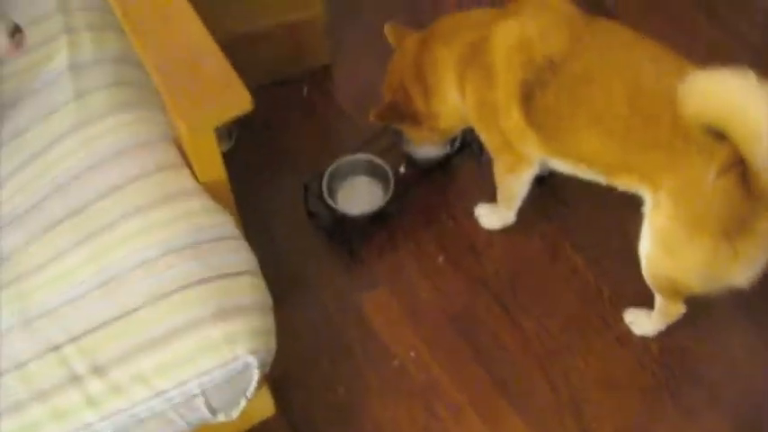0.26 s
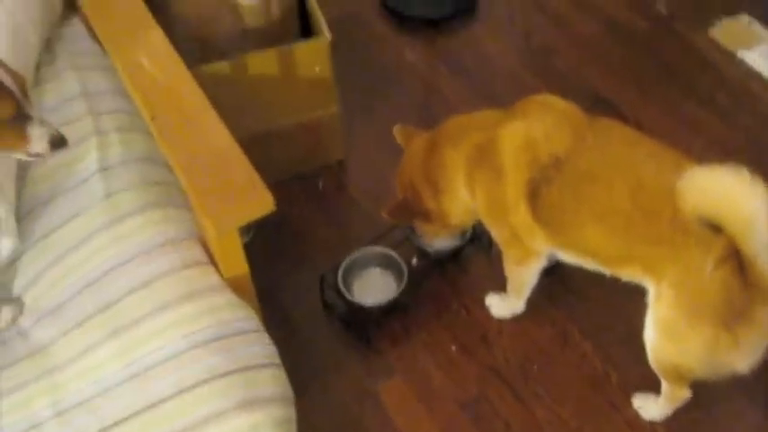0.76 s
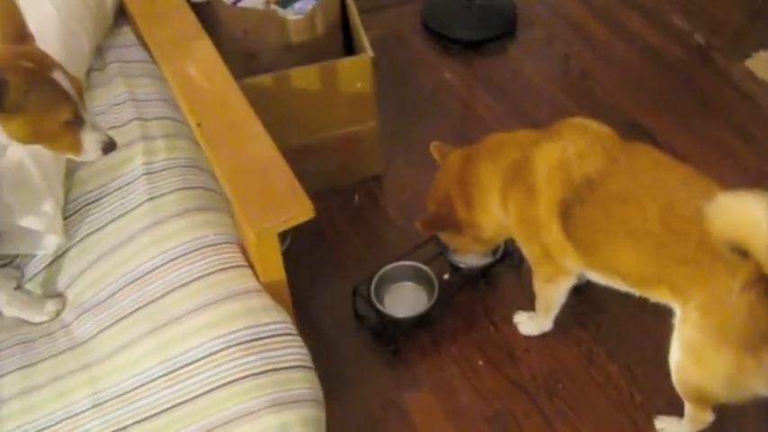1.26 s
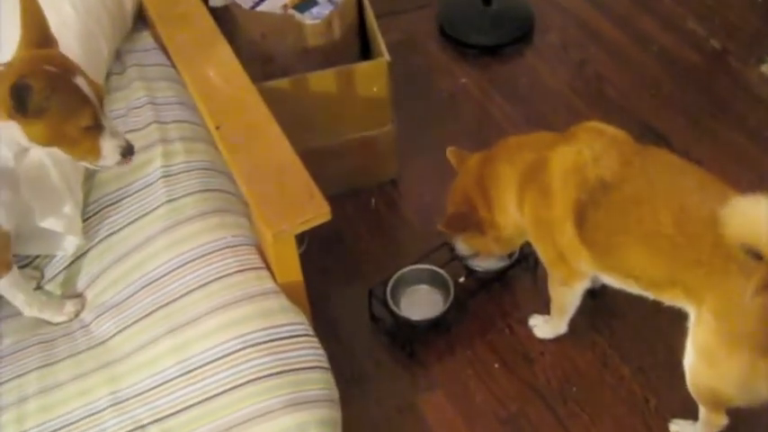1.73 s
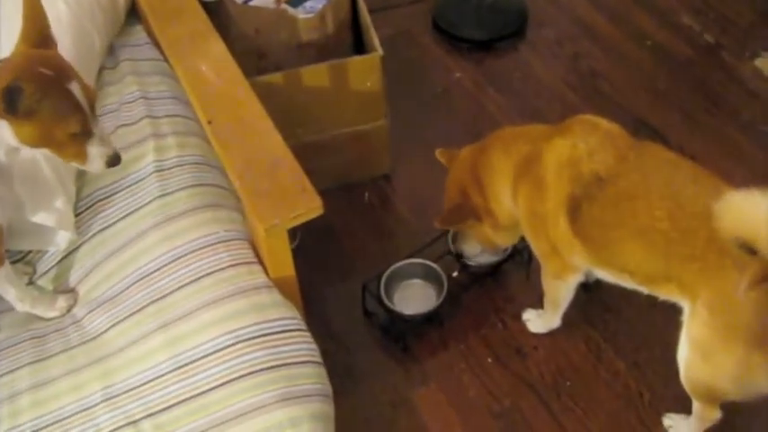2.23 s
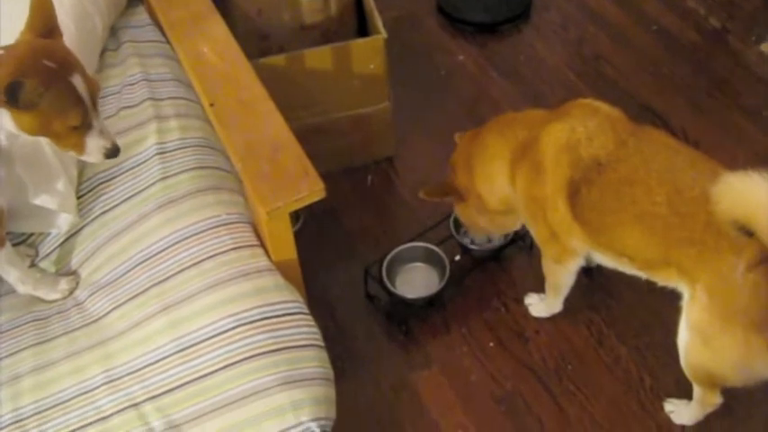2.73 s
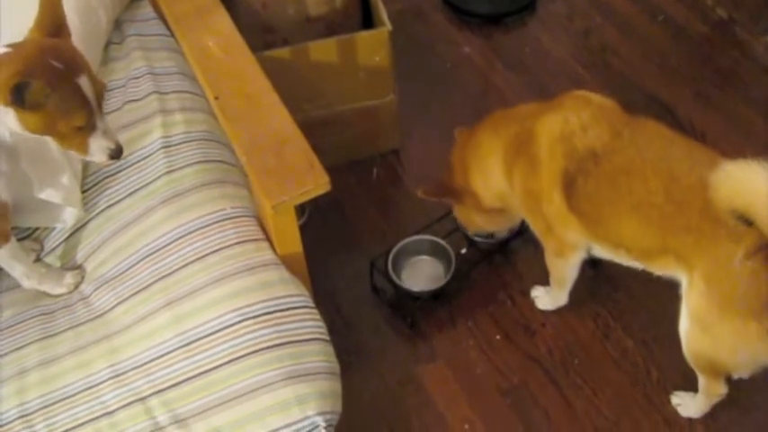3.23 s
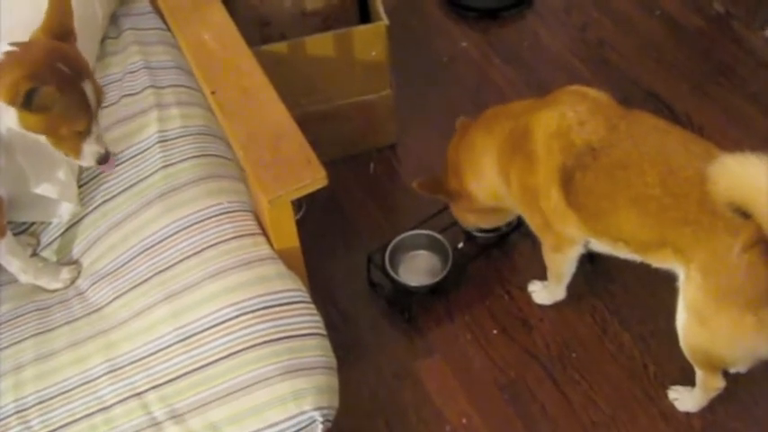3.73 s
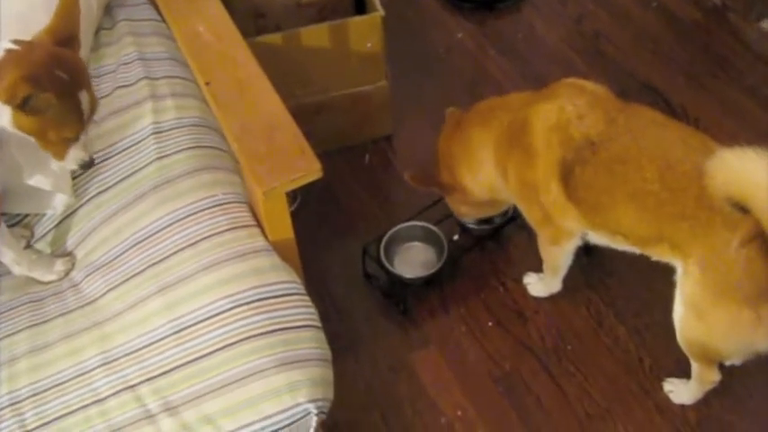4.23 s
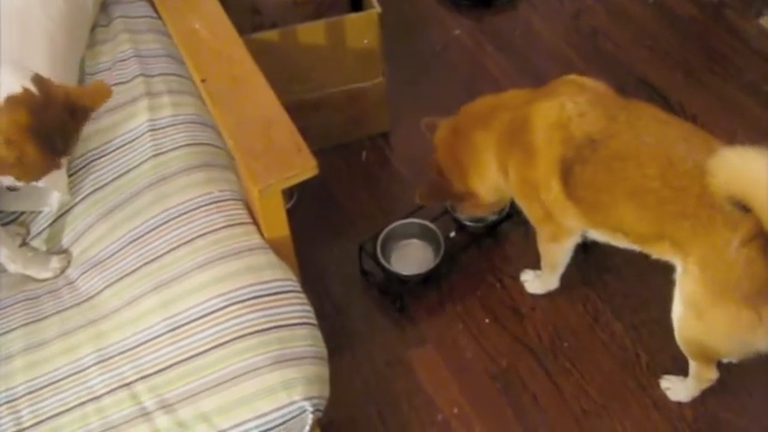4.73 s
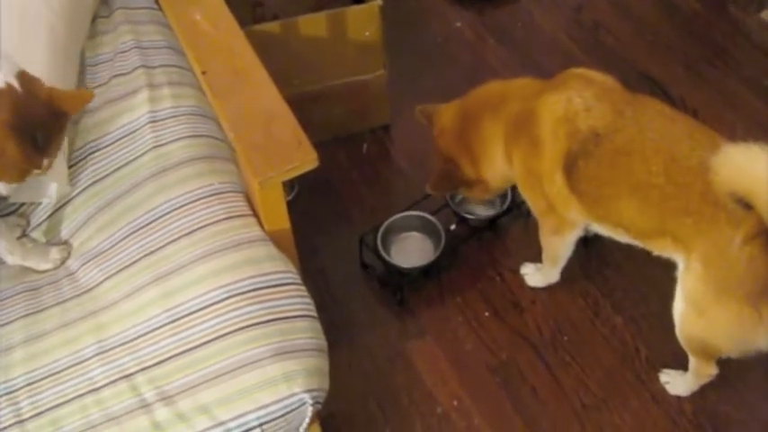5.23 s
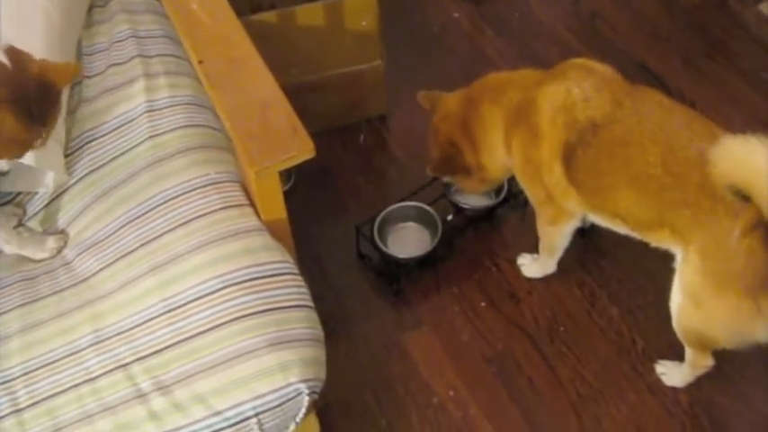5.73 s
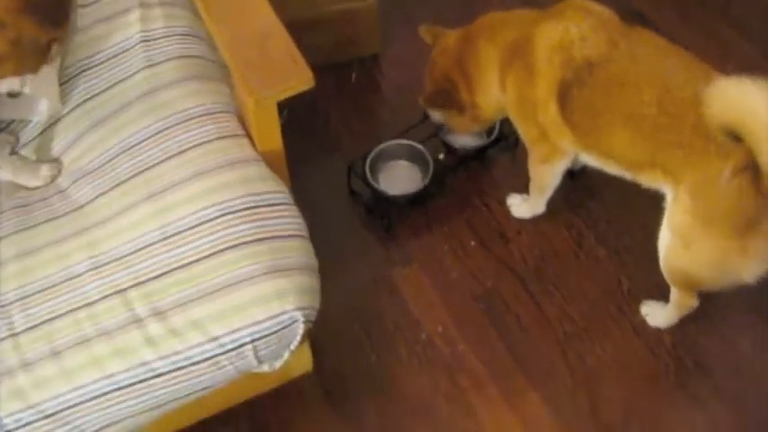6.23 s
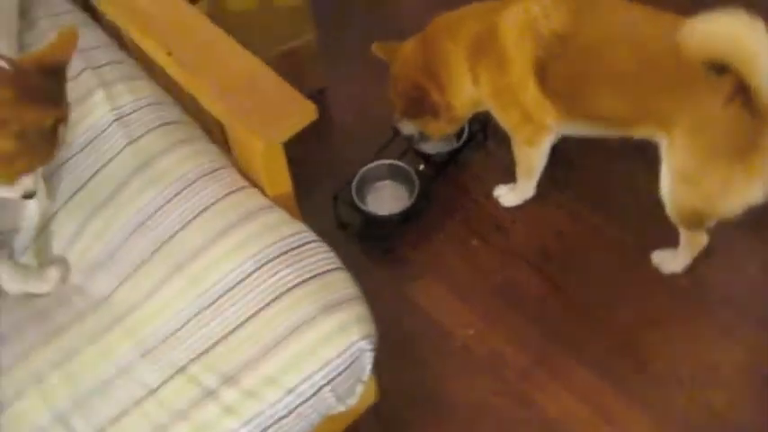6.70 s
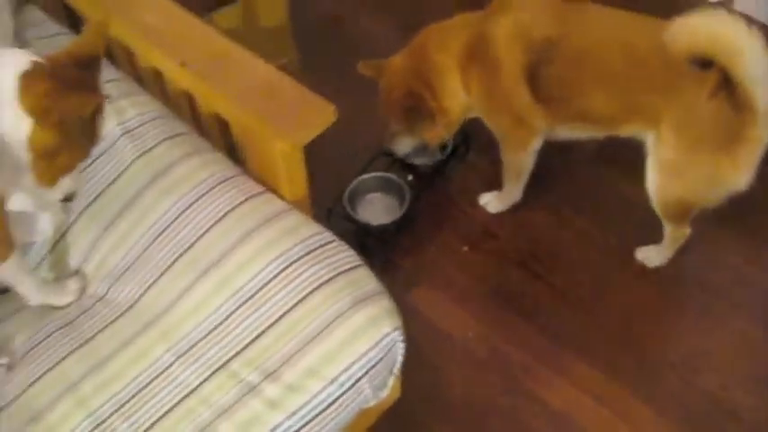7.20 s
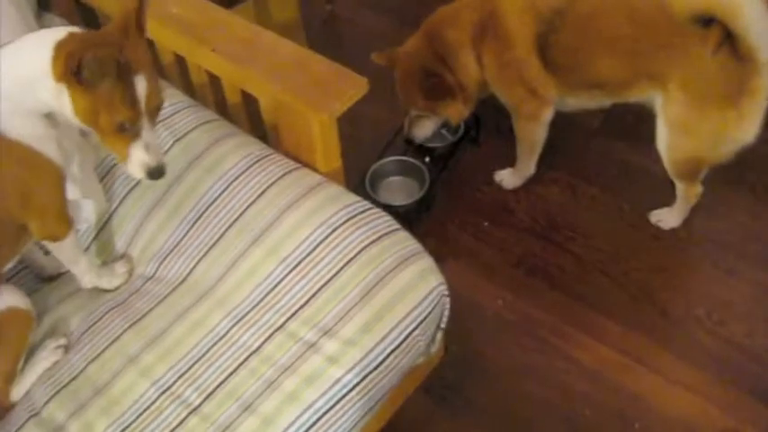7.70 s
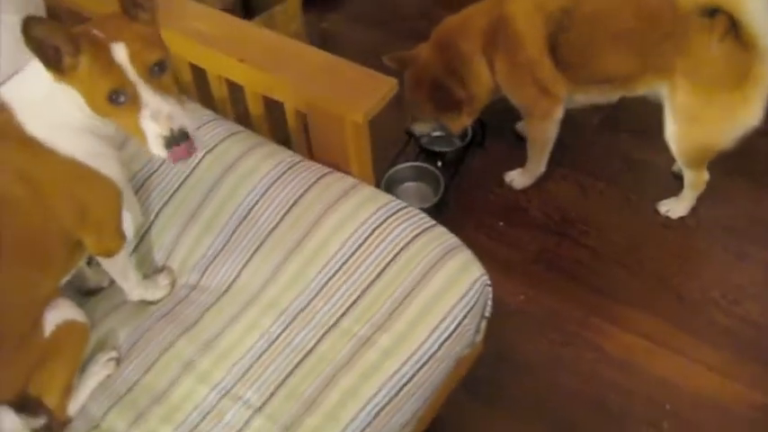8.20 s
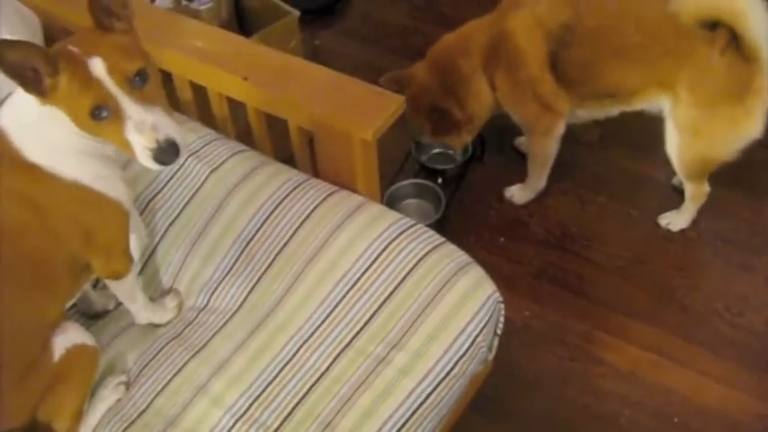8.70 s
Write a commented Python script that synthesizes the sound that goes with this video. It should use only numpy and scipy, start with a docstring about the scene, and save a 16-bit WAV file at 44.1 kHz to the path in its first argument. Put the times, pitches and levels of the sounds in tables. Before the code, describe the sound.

A dog licks an empty steel bowl sitting loosely in a wire stand, in a small room with short reverberation and a low steady hush. A close double clink comes at 0.2 seconds, then single clinks roughly every half second, at 0.6, 1.05, 1.5 and 2.0, with tiny wet pops and nudges between. A soft clink falls near 2.5 beside a sharp wet pop. From 3.2 to 5.2 the clanks are strongest and brightest, each followed about a tenth of a second later by a chattering rattle as the bowl drops back; the rim briefly rings. Around 5.7 to 6.6 the hits are more hollow, with crisp saliva ticks and a grainy tongue swish near 6.1. Clinks and softer rattles continue at 7.1, 7.5 and 8.2, ending on a bright, ringing clink near 8.7.

```python
"""Dog licking a steel bowl

A dog licks an empty steel bowl that sits loosely in a wire stand on a wooden floor, in a living room.
About twice a second the tongue shoves the bowl against the stand (a clink); then it drops back and rattles.
A bouncing force drives the bowl's damped modes and the diffuse room; harder blows are brighter.
Soft pushes frame the blows. Saliva pops and ticks, drag noise swishes, and the rim sometimes rings on."""
import sys
import numpy as np
from scipy import signal
from scipy.fft import rfft, irfft, next_fast_len
from scipy.io import wavfile

SR = 44100
rng = np.random.default_rng(int(sys.argv[2]) if len(sys.argv) > 2 else 0)


def write(x):
    x = np.atleast_2d(x).T
    wavfile.write(sys.argv[1], SR, np.round(np.clip(x, -1, 1) * 32767).astype(np.int16))


N = 394694
AGE = np.arange(int(.55 * SR)) / SR  # time since a contact (s)

# Bands that colour a contact (knock, body, clank, clink, sparkle): low edge f/Hz, high edge f/Hz
BANDS = [(150, 550), (550, 1600), (1600, 4500), (4500, 7700), (8300, 15500)]
# The tongue pushes and the bowl strikes the stand; levels precede the layer gain:
# t/s, level/dB, brightness/(dB per octave), hollowness/dB, chatter length/s, lead of the push/s
CLINKS = [(0.189, -30, 1, -1, 0.014, 0.000042), (.196, -25, -1.8, -4.5, 0.0053, 0.000027),
          (.622, -24, -1.05, -1, 0.022, 0.001), (1.049, -25.5, 0.1, -1, 0.013, 0.0012),
          (1.494, -26.5, -0.5, 4.5, 0.019, .026), (1.723, -30.5, 1.3, -0.5, 0.015, .02),
          (2.031, -23.5, -0.96, 0, 0.0052, .051), (2.545, -37.5, -1.3, -1.5, 0.0098, 0.00058),
          (3.171, -24.5, 1.8, 0, 0.013, 0.024), (3.674, -23, 0.6, -0.5, 0.021, .03),
          (4.179, -24, 0.85, 1, 0.027, .045), (4.463, -34, -2, -5.5, 0.0057, 0.00025),
          (4.697, -22.5, 0.4, 2, 0.036, .039), (5.203, -26, 1, 1.5, 0.025, 0.0017),
          (5.672, -26.5, -1.5, -2.5, 0.021, 0), (6.09, -28.5, 1, 5, 0.0042, 0),
          (6.568, -29, 0, 4.5, 0.009, 0.06), (7.107, -27, 0.95, 1, 0.018, 0.00077),
          (7.521, -24, -0.24, .5, 0.01, .035), (8.156, -28.5, -.4, -0.5, 0.021, 0.00023),
          (8.678, -25.5, 2, 3.5, 0.028, 0.00034)]
# The bowl drops back and rattles; levels precede the layer gain:
# t/s, level/dB, brightness/(dB per octave), hollowness/dB, chatter length/s
RATTLES = [(2.213, -39, -3.3, -3.5, 0.03), (2.646, -37.5, 0.7, 3, 0.027), (3.294, -24, 0.56, 0, 0.056),
           (3.798, -23, -0.2, -3, 0.045), (3.816, -23.5, 1.1, -1.5, 0.027),
           (4.014, -36.5, -2.2, -6.5, 0.016), (4.283, -35, -0.5, 0, 0.054), (4.813, -30.5, -0.5, 1, 0.035),
           (6.337, -34, -1.1, -3.5, 0.02), (6.789, -29, -0.5, 0.5, 0.059), (7.29, -31, -0.1, -5, 0.051),
           (7.792, -30.5, 1, -0.5, 0.044), (8.303, -29.5, 0.2, 1, 0.055)]
# Relative spectrum of the bowl's dense overtones in the room: f/Hz, density/(dB per Hz)
CLATTER = [(71, -45), (120, -12), (170, -1), (325, 2), (541, -5), (662, -4.5), (829, -8.5), (1220, -0.5),
           (1910, -4), (2390, 6.5), (2920, -6), (3240, -4), (5380, -20.5), (8080, -19), (10500, -23),
           (15500, -18.5)]


def amp(db):
    """Level definition: decibels to an amplitude ratio."""
    return 10 ** (np.asarray(db) / 20)


def unit(x):
    """Normalisation: scale to a root-mean-square value of 1."""
    return x / np.sqrt(np.mean(x ** 2) + 1e-20)


def along(points, hz):
    """Logarithmic interpolation: read (f/Hz, value) points on a log frequency axis."""
    f, v = np.transpose(points)
    return np.interp(np.log(hz + 1), np.log(f + 1), v)


def filtered(x, gain):
    """Linear filtering: multiply the spectrum by a gain that depends on frequency."""
    m = next_fast_len(len(x) + 4096)
    return irfft(rfft(x, m) * gain(np.fft.rfftfreq(m, 1 / SR)), m)[:len(x)]


def add(out, s, x):
    """Superposition: mix x into out, starting at time s."""
    i = int(np.clip(round(s * SR), 0, N - 1))
    out[i:i + len(x)] += x[:N - i]


def room_tone(level_db):
    """Stationary noise: random pressure with a fixed spectrum is the steady hush of the room."""
    # Relative spectrum of the hush: f/Hz, density/(dB per Hz)
    air = [(15, -30), (25, 4.5), (313, 4), (782, 1.5), (1240, 2.5), (1340, 0), (2010, -0.5), (2850, -2),
           (5580, -5), (6730, -6), (7910, -12.5), (10100, -9), (15500, -13)]
    hush = filtered(rng.standard_normal(N), lambda f: amp(along(air, f)))
    return amp(level_db) * unit(hush)


def wash(spectrum, build_cycles):
    """Diffuse field: each frequency builds over a time set in cycles, then decays at the room's rate."""
    # Reverberation of the room: f/Hz, t60/s
    room = [(150, 0.48), (400, 0.21), (1000, 0.26), (2800, 0.21), (7000, 0.33), (15000, 0.16)]
    hz, t, z = signal.stft(rng.standard_normal(len(AGE)), SR, nperseg=256)
    build = 1 - np.exp(-(t + 0.001) * (hz[:, None] + 1) / build_cycles)
    decay = amp(-60 * t / along(room, hz)[:, None])
    tail = signal.istft(z * build * decay, SR, nperseg=256)[1][:len(AGE)]
    return unit(filtered(tail, lambda f: amp(along(spectrum, f))))


def peels(spread_s, spread_db, spread_octaves, width):
    """Film rupture: the tongue peels off after each clink, with one tick of slightly random time and pitch."""
    delay_s, level_db, pitch_hz = .29, -35, 10000  # level before the layer gain
    chance = rng.standard_normal((len(CLINKS), 3))
    ticks = []
    for (s, *_), (a, b, c) in zip(CLINKS, chance):
        when = s + delay_s + spread_s * a
        if when < N / SR:
            ticks.append((when, level_db + spread_db * b, pitch_hz * 2 ** (spread_octaves * c), width))
    return ticks


def tongue(tick_db, wet_db, life):
    """Film rupture and friction: saliva films snap in short ticks; the dragging tongue gives a grainy swish."""
    # Loudest wet ticks and pops, before the layer gain: t/s, peak level/dB, pitch f/Hz, width/octaves
    loud_ticks = [(.084, -28.5, 1686, 0.47), (.473, -21.5, 6040, 2.3), (2.453, -16.5, 1700, 0.28),
                  (2.825, -25, 1270, 0.29), (3.437, -22, 5560, 0.16), (4.667, -16, 1950, 0.43),
                  (4.954, -21.5, 6000, 3.1), (6.022, -22.5, 5800, 5), (6.126, -14, 4500, 1.5),
                  (6.446, -24, 4500, .75), (8.466, -20, 11100, 3.2)]
    # The tongue drags over the steel: middle t/s, half length/s, level/dB
    swishes = [(6.136, 0.037, -39.5), (6.5, 0.077, -50), (6.696, 0.048, -46), (7.232, 0.076, -55),
               (7.44, 0.07, -57), (7.637, 0.2, -51.5), (7.944, 0.042, -42), (8.086, 0.06, -38)]
    out, t = np.zeros(N), np.arange(N) / SR
    for s, db, hz, width in loud_ticks + peels(spread_s=.05, spread_db=0.5, spread_octaves=0.2, width=.7):
        # a peak at the pitch that falls off on both sides
        colour = [(hz * 2 ** (k * width), -18 * np.log10(1 + 2 * k * k)) for k in range(-6, 7)]
        tick = wash(colour, build_cycles=0.84) * (np.exp(-AGE / life) + amp(wet_db))
        add(out, s, amp(db + tick_db) * tick / np.abs(tick).max())
    drag_colour = [(200, -27), (600, -6.5), (1400, 1), (2600, -1.5), (5000, -6), (9000, -15.5), (15000, -16)]
    grains = rng.standard_normal(N) ** 3  # cubing makes the noise spiky
    drag = unit(filtered(grains, lambda f: amp(along(drag_colour, f))))
    strokes = sum(amp(db) * np.exp(-((t - s) / half) ** 2) for s, half, db in swishes)
    return out + drag * strokes


def pushes():
    """Soft contact: (s, level in each band, chatter s) around each clink, before each rattle, and alone."""
    # The tongue only nudges the bowl, before the layer gain: t/s, level/dB
    nudges = [(.005, -52), (0.304, -42.5), (.725, -48.5), (1.215, -45.5), (1.27, -48.5), (2.449, -50),
              (2.815, -55.5), (2.998, -48), (3.154, -38), (4.86, -55), (5.775, -45.5), (5.83, -46.5),
              (6.265, -46), (7.913, -49), (8.209, -46.5)]
    # A soft push in each band, knock to sparkle, over its level: level/dB
    nudge_tone = [-5, 1, -7.5, -11, -17]
    push_db = -19.5  # relative to the clink that follows
    slip_s, slip_db = .036, -13  # the bowl slips this long before it rattles, this much softer
    settle_s, settle_db = .105, -27  # it settles this long after a clink, this much softer
    scuff_s = 0.033
    before = [(s - lead, db + push_db) for s, db, *_, lead in CLINKS if lead > 0]
    after = [(s + settle_s, db + settle_db) for s, db, *_ in CLINKS]
    slips = [(s - slip_s, db + slip_db) for s, db, *_ in RATTLES]
    return [(s, db + np.array(nudge_tone), scuff_s) for s, db in before + after + slips + nudges]


def saliva(cycles, spread_octaves, spread_db, room_db, count):
    """Bubble resonance: tiny bubbles burst as damped sines between tongue and steel during each soft push."""
    pop_db, centre_hz, spread_s = -0.5, 970, .04  # middling level over the push's strongest band
    out, t = np.zeros(N), np.arange(SR // 40) / SR
    for s, levels_db, _ in pushes():
        for when, pitch, size in np.clip(rng.standard_normal((count, 3)), -2, 2):
            hz = np.clip(centre_hz * 2 ** (spread_octaves * pitch), 450, 5000)  # the sizes a bubble can have
            pop = np.exp(-t * hz / cycles) * np.sin(2 * np.pi * hz * t)
            add(out, s + spread_s * abs(when), amp(levels_db.max() + pop_db + spread_db * size) * pop)
    room = wash(CLATTER, build_cycles=0.89)
    return out + amp(room_db) * signal.fftconvolve(out, room / np.linalg.norm(room))[:N]


def rim():
    """Free vibration: each blow rings the rim's modes until the next firm clink damps them; some sing on."""
    # Modes of the free rim: f/Hz, level relative to the blow/dB, t60/s
    rim_modes = [(660.5, -7.5, 0.18), (1174, -6, 0.17), (1248, -15.5, 0.59), (2058, -33, 3.06),
                 (2492, -11.5, 0.42), (2630, -7, 0.13), (3115, -7.5, 0.16), (3650, -23, 0.34),
                 (4110, -17, 0.14), (5130, -24, 0.29), (5270, -17, .38), (5470, -20, 0.29),
                 (5600, -12, 0.18)]
    # Some blows leave one or more clear pitches singing on: t/s, f/Hz, level/dB
    sings = [(.195, 2039, -44), (.195, 2464, -25.5), (.195, 3687, -31.5), (.622, 2039, -46.5),
             (.622, 660, -27), (.622, 2455, -32), (1.495, 1157, -25), (3.171, 660, -22.5),
             (3.171, 5218, -35), (3.3, 2659, -18.5), (3.32, 3687, -34.5), (3.821, 1248, -26.5),
             (3.82, 3687, -30), (4.179, 5218, -32.5), (4.285, 5490, -42), (4.697, 5081, -28),
             (5.203, 5081, -31.5), (5.672, 2284, -39), (6.331, 5460, -45), (6.789, 5490, -37),
             (7.29, 2464, -32.5), (8.68, 3150, -23.5), (8.7, 2464, -22.5)]
    scatter_db = -1  # strengths of the rim modes change from blow to blow
    detune = 0.00175  # the tongue's load shifts the pitches by this share from blow to blow
    out, t = np.zeros(N), np.arange(SR) / SR
    stops = [s for s, db, *_ in CLINKS if db > -32]  # only firm clinks damp the rim
    pitches, _, t60s = np.transpose(rim_modes)
    # a singing pitch decays like the listed mode nearest to it
    rings = [(s, hz, db, t60s[np.argmin(abs(pitches - hz))]) for s, hz, db in sings]
    for s, db, *_ in CLINKS + RATTLES:
        chance = rng.standard_normal((len(rim_modes), 2))
        for (hz, mode_db, t60), (size, shift) in zip(rim_modes, chance):
            rings.append((s, hz * (1 + detune * shift), db + mode_db + scatter_db * size, t60))
    for s, hz, db, t60 in rings:
        free = min([stop - s for stop in stops if stop > s + .1], default=np.inf)
        age = t[t < t60]
        held = np.exp(-np.maximum(age - free, 0) / .02)
        envelope = held * amp(db - 60 * age / t60) * (1 - np.exp(-age / 0.017))
        add(out, s, envelope * np.sin(2 * np.pi * hz * age))
    return out


def steel(scatter_db, rise):
    """Modal synthesis: a sum of damped sines whose strengths change with the point of contact."""
    # Modes of the bowl in its stand: f/Hz, level/dB, t60/s
    bowl = [(327, -8.5, 0.51), (421.7, -4, 0.32), (652, -12.5, 0.47), (997.4, -4, 0.19), (1079, -2.5, 0.23),
            (1221, -6.5, 0.37), (2052, -7.5, 0.34), (2185, -22, 0.18), (2464, -7, 0.25), (2750, -9, 0.28),
            (3165, 1.5, 0.13), (3357, 2.5, 0.072), (3632, -16.5, 0.71), (3640, -8, 0.34),
            (4220, -0.5, 0.11), (5200, -11.5, 0.26), (5330, -6, 0.087), (5570, -2, 0.072),
            (6030, -14.5, 0.26), (6830, -5.5, 0.15), (6520, -8, 0.11), (7400, -18, .3), (8610, -19, 0.21),
            (9700, -39, 0.71), (10400, -5, 0.074), (10880, -13, 0.24), (13050, -30, 0.29)]
    hz, db, t60 = np.transpose(bowl)[:, :, None].astype(np.float32)  # one row per mode
    size, phase, detune = rng.standard_normal((3, len(bowl), 1)).astype(np.float32)
    t = AGE.astype(np.float32)
    turn = 2 * np.pi * (hz * (1 + 0.0012 * detune) * t + phase)  # the tongue's load shifts the pitches a little
    decay = np.exp(-t * float(np.log(1000)) / t60)
    waves = amp(db + scatter_db * size) * decay * np.sin(turn)
    return unit(waves.sum(0) * (1 - np.exp(-AGE / rise)))


def chatter(length, rate, bounce_db):
    """Repeated impact: one blow, then small uneven bounces that fade over the given length."""
    when, size = rng.random(64), rng.standard_normal(64)
    times = np.cumsum(.3 + 1.4 * when) / rate
    fade = np.exp(-(times / max(length, .002)) ** 4)
    force = np.bincount((times * SR).astype(int), amp(bounce_db) * size * fade)
    force[0] = 1
    return force


def crack(life):
    """Impact noise: the first hard touch of steel on wire is a few milliseconds of bright noise."""
    burst = rng.standard_normal(len(AGE)) * AGE * np.exp(-AGE / life)
    colour = [(200, -18), (1200, 11.5), (4000, 16.5), (15000, 11.0)]
    return unit(filtered(burst, lambda f: amp(along(colour, f))))


def voiced(x, levels_db):
    """Band equalisation: filter a contact by the gain its first 40 ms need to reach each band's level."""
    head = x[:SR // 25]
    power = 2 * np.abs(rfft(head) / len(head)) ** 2
    hz = np.fft.rfftfreq(len(head), 1 / SR)
    gains = []
    for (lo, hi), db in zip(BANDS, levels_db):
        band_power = power[(hz > lo) & (hz < hi)].sum() + 1e-20
        gains.append((np.sqrt(lo * hi), db - 10 * np.log10(band_power)))
    return filtered(x, lambda f: amp(along(gains, f)))


def blows(table):
    """Impact spectrum: strength, brightness and hollowness set (s, level in each band, chatter s)."""
    # A blow of middling strength in each band, knock to sparkle; harder blows are brighter:
    # level over the blow's/dB, growth/(dB per dB of strength)
    blow_tone = [(-12, .5), (-0.5, 0.6), (-0.5, 1), (-4.5, 1.2), (-9.5, 1.42)]
    # A hollow blow trades clank for body, in each band: change/(dB per dB of hollowness)
    hollow_tone = [0.48, 1, -0.67, 0.25, 0.077]
    middling_db, pivot_hz = -28, 1790  # brightness tilts the spectrum about the pivot
    tone_db, growth = np.transpose(blow_tone)
    octaves = np.log2(np.sqrt(np.prod(BANDS, axis=1)) / pivot_hz)
    hits = []
    for s, db, bright, hollow, length, *_ in table:
        strength_db = middling_db + tone_db + growth * (db - middling_db)
        hits.append((s, strength_db + bright * octaves + hollow * np.array(hollow_tone), length))
    return hits


def contacts(table, gain_db, ring_db, early_db, crack_db, rate, bounce_db):
    """Convolution: steel meets wire with a crack, and the bouncing force drives the bowl's modes and the room."""
    # Level of the low knock over time: t/s, level/dB
    knock = [(0, -1), (2, -1.5), (3.2, -0.5), (5.7, -0.5), (6.3, 2), (8.2, 3), (8.7, 1.5)]
    out = np.zeros(N)
    for s, levels_db, length in table:
        early = 1 + amp(early_db) * np.exp(-AGE / 0.0034)  # floor and furniture answer first
        room = early * wash(CLATTER, build_cycles=2.4)
        answer = room + amp(ring_db) * steel(scatter_db=3.5, rise=0.00033)
        hit = unit(signal.fftconvolve(answer, chatter(length, rate, bounce_db))[:len(AGE)])
        knock_db = np.interp(s, *np.transpose(knock)) * np.eye(len(BANDS))[0]  # lowest band only
        add(out, s, voiced(hit + amp(crack_db) * crack(life=0.0047), gain_db + levels_db + knock_db))
    return out


def scene():
    """Superposition: room, tongue and bowl add at one microphone."""
    hush = room_tone(level_db=-55.06)
    licks = tongue(tick_db=-11.5, wet_db=-11, life=0.0019)
    pops = saliva(cycles=1.14, spread_octaves=0.87, spread_db=4.5, room_db=-0.5, count=6)
    nudges = contacts(pushes(), gain_db=-2.5, ring_db=-2, early_db=-0.5, crack_db=-36, rate=250, bounce_db=-7.5)
    rattles = contacts(blows(RATTLES), gain_db=-7, ring_db=-4, early_db=5.0, crack_db=-15,
                       rate=300, bounce_db=-2.5)
    clinks = contacts(blows(CLINKS), gain_db=-6.0, ring_db=-5.5, early_db=-5, crack_db=-14.0,
                      rate=350, bounce_db=-4.5)
    return (hush + licks + pops + nudges + rim() + rattles + clinks)[None]


def record(dry):
    """Transfer function: the microphone has a narrow treble notch, and the recorder a steep band limit."""
    top_hz = 15850

    def response(f):
        notch = amp(-30 * np.exp(-np.abs((f - 7880) / 190) ** 0.65))
        return notch * np.clip((top_hz - f) / 100, 0, 1)

    return filtered(dry[0], response)[None]


dry = scene()
out = record(dry)
write(out)
```